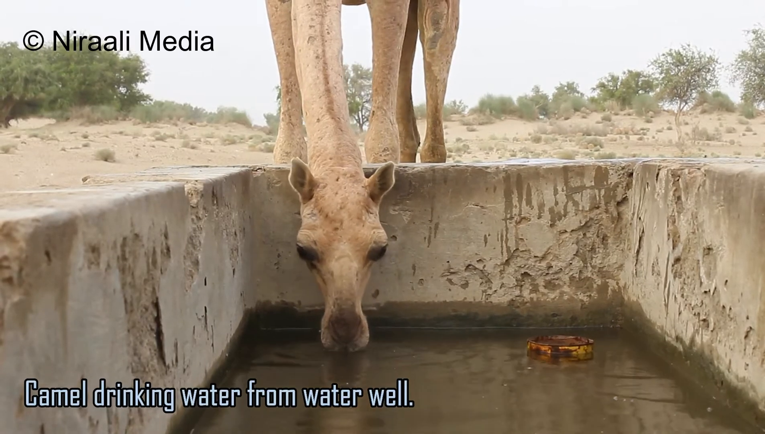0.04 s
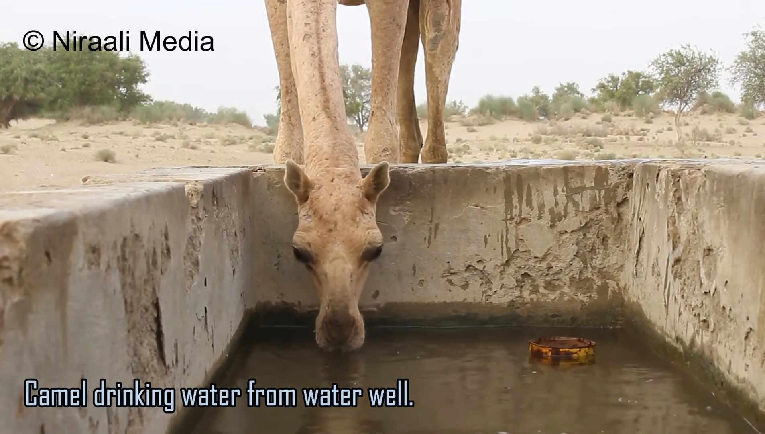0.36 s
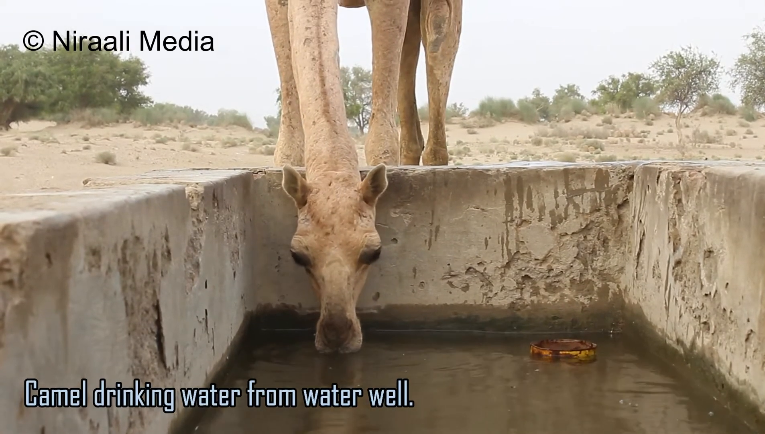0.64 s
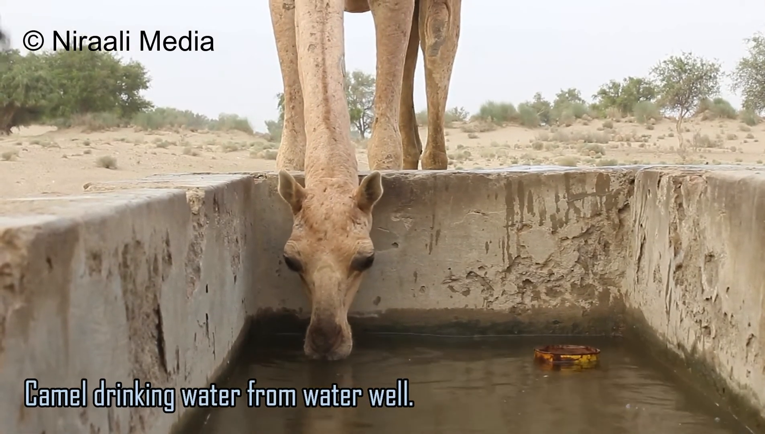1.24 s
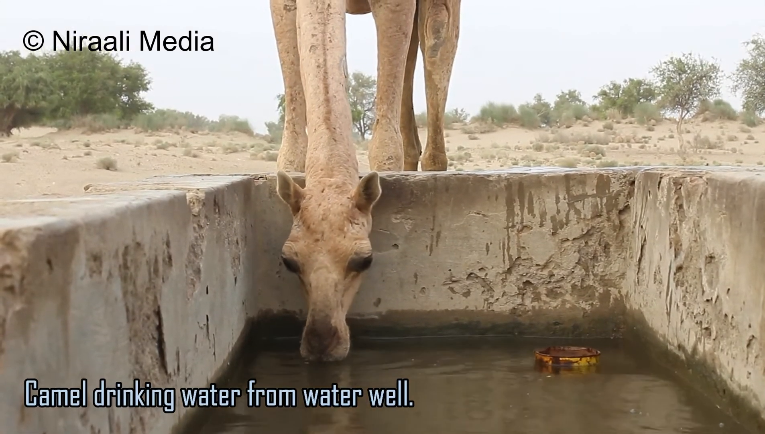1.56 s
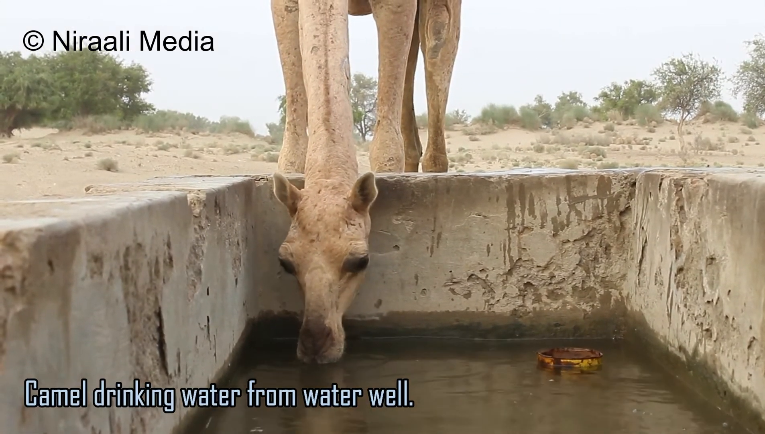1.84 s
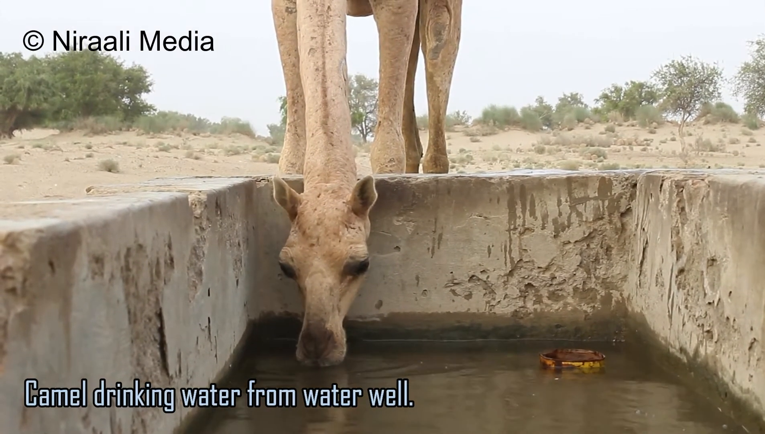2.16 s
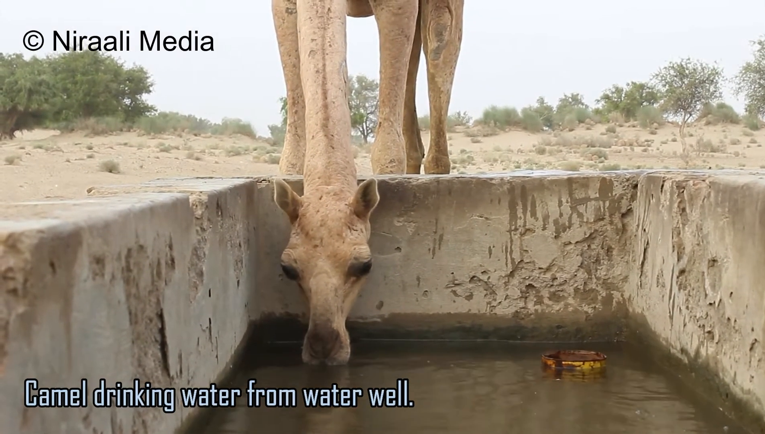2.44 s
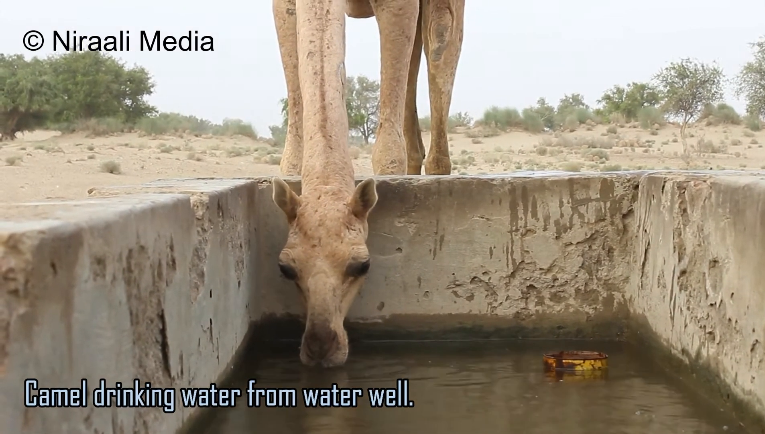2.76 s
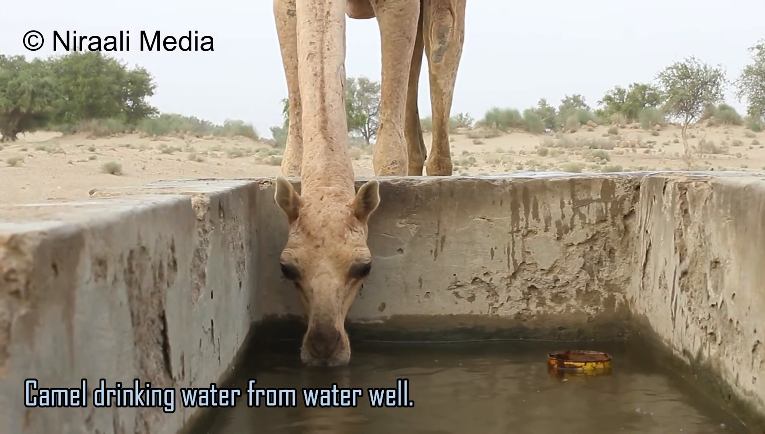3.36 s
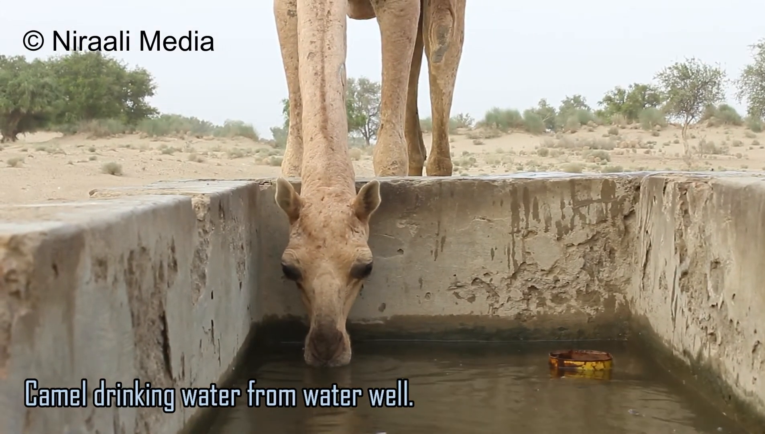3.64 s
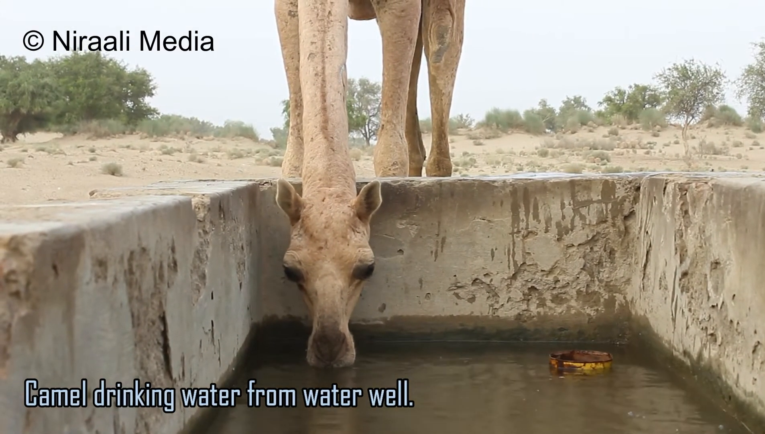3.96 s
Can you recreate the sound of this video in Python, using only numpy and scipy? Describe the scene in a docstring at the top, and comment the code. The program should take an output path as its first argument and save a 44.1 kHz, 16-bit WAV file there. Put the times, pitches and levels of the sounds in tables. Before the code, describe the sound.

Quiet sipping of a camel at a water trough, with wind rumbling on the microphone.

```python
"""A camel sips from a concrete trough in open desert, a few metres from the microphone.
Pockets of air ring as bubbles at its lips, among soft slurps, low sloshes, tiny clicks of snapping
water and one large plop. The trough walls throw the lip sounds back briefly.
Light wind rumbles on the microphone over a faint far-off motor hum and an even hiss."""
import sys
import numpy as np
from scipy import signal
from scipy.fft import rfft, irfft
from scipy.io import wavfile
from scipy.ndimage import uniform_filter1d

SR = 44100
rng = np.random.default_rng(int(sys.argv[2]) if len(sys.argv) > 2 else 0)


def digitize_waveform(pressure):
    """Quantize a signal to 16-bit integers and store it at the path in sys.argv[1].

    Rows of a 2-D input are taken as channels; values are limited to [-1, 1].
    """
    field = np.atleast_2d(pressure).T
    bounded = np.clip(field, -1, 1)
    quanta = np.round(bounded * 32767).astype(np.int16)
    wavfile.write(sys.argv[1], SR, quanta)


N = 176400  # 4 seconds

WATER_PAN_DB, HISS_PAN_DB, BASS_PAN_DB = -3, -1.6, 1.5  # left minus right
RISE_CYCLES, BUBBLE_CYCLES = 0.75, 7.24  # swings a bubble takes to swell, and to fade to about a third


def amp(db):
    """Turns decibels into a gain to multiply by."""
    return 10 ** (np.asarray(db) / 20)


def unit(x):
    """Scales a signal to an average power of one."""
    return x / np.sqrt(np.mean(np.abs(x) ** 2) + 1e-30)


def read(points, hz, column=1):
    """Looks up a table at any pitch, sliding smoothly between its rows."""
    table = np.array(points, float)
    return np.interp(np.log(hz + 1), np.log(table[:, 0] + 1), table[:, column])


def curve(points):
    """Joins (time_s, value) points with straight lines."""
    return np.interp(np.arange(N) / SR, *np.transpose(points))


def pan(db):
    """Left and right gains that make the left side louder by db."""
    return amp(np.array([[.5], [-.5]]) * db)


def add(mix, start_s, sound):
    """Adds a sound to the mix at a given time."""
    part = mix[max(round(start_s * SR), 0):][:len(sound)]
    part += sound[:len(part)]


def noise(colour, same, pan_db):
    """Stereo noise shaped by a colour table; same=1 makes both sides alike, 0 unrelated."""
    hz = np.fft.rfftfreq(N, 1 / SR)
    mid, side = rfft(rng.standard_normal((2, N)))
    spectrum = np.sqrt(1 + same) * mid + np.array([[1], [-1]]) * np.sqrt(1 - same) * side
    return unit(irfft(spectrum * amp(read(colour, hz)) * pan(pan_db), N))


def air(level_db=-58.5):
    """Open air: a low distant wash under a faint steady hiss."""
    # Tone of the air: pitch_hz, relative_db
    colour = [(20, -80), (60, -79), (110, -83), (160, -89), (320, -93), (480, -100), (800, -104),
              (1200, -106), (2200, -110), (4000, -111), (5500, -108), (7500, -115), (12500, -114),
              (16000, -125)]
    # How alike left and right are: pitch_hz, likeness (0 to 1)
    likeness = [(30, 0.75), (120, 0.69), (700, 0.68), (3000, 0.32), (5700, 0.041), (8000, 0.5)]
    hz = np.fft.rfftfreq(N, 1 / SR)
    bass_share = 1 / (1 + (hz / 550) ** 2)
    pan_db = HISS_PAN_DB + (BASS_PAN_DB - HISS_PAN_DB) * bass_share
    return amp(level_db) * noise(colour, read(likeness, hz), pan_db)


def motor(waver=0.57):
    """A far-off motor hums with three wavering low tones."""
    # Tones of the hum (wider ones waver faster): pitch_hz, level_db, width_hz
    tones = [(102.05, -65, 1), (121, -68.5, 2.2), (236.2, -79, 7.6)]
    t, offset_hz = np.arange(N) / SR, np.fft.fftfreq(N, 1 / SR)
    out = np.zeros((2, N))
    for hz, db, width_hz in tones:
        jitter = rng.standard_normal((2, N)) + 1j * rng.standard_normal((2, N))
        keep_slow = np.exp(-(offset_hz / width_hz) ** 2)
        shared, apart = unit(np.fft.ifft(np.fft.fft(jitter) * keep_slow))
        drift = 1 + waver * shared + np.array([[.3], [-.3]]) * apart
        out += amp(db) * unit((drift * np.exp(2j * np.pi * hz * t)).real)
    return pan(BASS_PAN_DB) * out


def wind(gust_half_s=0.057):
    """A breeze and short gusts rumble on the microphone."""
    # Strength of the breeze: time_s, level_db
    breeze = [(0, -54), (.8, -65), (1.5, -51.5), (2.05, -58), (2.7, -52), (2.95, -57), (4, -58.5)]
    # Gusts: middle_s, level_db
    gusts = [(.06, -43), (.45, -48.5), (0.952, -46), (1.1, -48), (1.27, -46), (1.44, -45), (1.62, -45),
             (1.79, -43.5), (2.199, -43), (2.37, -48.5)]
    # Tone of the rumble: pitch_hz, relative_db
    colour = [(5, -12), (22, 8.5), (35, -4.5), (55, -6.5), (90, -14), (160, -35.5), (1500, -73)]
    t = np.arange(N) / SR
    buffets = sum(amp(db) * np.exp(-((t - s) / gust_half_s) ** 2) for s, db in gusts)
    return noise(colour, same=0.52, pan_db=BASS_PAN_DB) * np.hypot(amp(curve(breeze)), buffets)


def sloshes():
    """The muzzle pushes water about in muffled swells."""
    # Swells of water: middle_s, half_length_s, level_db
    swells = [(1.664, 0.15, -62), (2.224, 0.3, -62), (3.357, 0.25, -68)]
    # Tone of the water: pitch_hz, relative_db
    colour = [(60, -60), (130, -0.5), (185, 7), (300, -8), (700, -8.5), (1500, -53)]
    t = np.arange(N) / SR
    loudness = sum(amp(db) * np.exp(-((t - s) / half_s) ** 2) for s, half_s, db in swells)
    return noise(colour, same=0.73, pan_db=0.5) * loudness


def trough(sound, echo_db, build_s=0.0033):
    """A sound followed by a short blur of echoes from the concrete walls."""
    # Echoes of the walls: pitch_hz, fade_s (time to fall 60 dB), relative_db
    walls = [(300, 0.17, -4), (740, 0.32, -12), (1030, 0.17, -0.5), (2070, 0.1, 1.5), (3580, 0.062, 1),
             (5460, 0.11, 1), (8000, 0.28, -9), (12100, .12, -1.5), (15900, 0.034, -5.5)]
    hz, t, spectrum = signal.stft(rng.standard_normal((2, SR // 2)), SR, nperseg=256)
    fade_s, start_db = read(walls, hz)[:, None], read(walls, hz, column=2)[:, None]
    tail = signal.istft(spectrum * amp(start_db - 60 * t / fade_s), SR, nperseg=256)[1]
    tail *= 1 - np.exp(-(np.arange(tail.shape[1]) / SR / build_s) ** 2)
    mid, side = tail / np.linalg.norm(tail[0])
    echoes = amp(echo_db) * (mid + np.array([[1], [-1]]) * amp(-8.0) * side)
    echoes[:, 0] += 1  # the direct sound
    return signal.fftconvolve(sound[None], echoes, axes=1)[:, :N]


def pop(hz, cycles, sag=.1, sag_s=0.015):
    """A small pocket of air opens and rings out, sagging a little in pitch."""
    ring_s = cycles / hz
    t = np.arange(int(6 * ring_s * SR) + 24) / SR
    pitch_hz = hz * (1 - sag * (1 - np.exp(-t / sag_s)))
    shape = (1 - np.exp(-t * hz / RISE_CYCLES)) * np.exp(-(t / ring_s) ** 1.11)
    return shape / shape.max() * np.sin(2 * np.pi * np.cumsum(pitch_hz) / SR)


def faint_pops(colour, per_s, cycles, spread_db, clump, tries=6000):
    """Sipping makes many faint pops of all sizes, arriving in little clusters."""
    # Strength of the sipping: time_s, gain_db
    sipping = [(0, -4), (.7, -3.5), (1.4, -3), (2.2, -1.5), (2.65, -2), (3.05, 0.5), (3.35, -2.5), (4, 1)]
    out = np.zeros(N)
    bursts = np.exp(clump * unit(uniform_filter1d(rng.standard_normal(N), size=1800)))
    chance = bursts / bursts.mean() * per_s * N / SR / tries
    low_hz, high_hz = colour[0][0], colour[-1][0]
    for when, dice, pitch, ring, softness in rng.random((tries, 5)):
        if dice < chance[int(when * N)]:
            hz = low_hz * (high_hz / low_hz) ** pitch
            db = read(colour, hz) + spread_db * (min(-np.log(softness), 2) - 1)
            add(out, when * N / SR, amp(db) * pop(hz, cycles * (.5 + ring)))
    return out * amp(curve(sipping))


def slurps(count=50, spread_s=.028, centre_hz=2695, spread_octaves=0.54):
    """Water drawn between the lips makes clouds of tiny bubbles, too dense to tell apart."""
    # Slurps: middle_s, bubble_level_db
    clouds = [(0.578, -74), (2.61, -63.5), (2.8, -68), (3.0, -68), (3.82, -65.5)]
    out = np.zeros(N)
    for middle_s, db in clouds:
        for when, pitch in rng.standard_normal((count, 2)):
            hz = centre_hz * 2 ** (spread_octaves * pitch)
            add(out, middle_s + spread_s * when, amp(db) * pop(hz, BUBBLE_CYCLES / 2))
    return out


def spray(hz, fade_s=0.017, top_hz=13500, grain_db=0.5, size=4096):
    """Tiny droplets make a grainy puff of noise, spread about an octave either side of a pitch."""
    hiss = rng.standard_normal(size)
    grains = hiss * amp(grain_db * np.repeat(rng.standard_normal(size // 32), 32))
    all_hz = np.fft.rfftfreq(size, 1 / SR) + 1
    colour = np.exp(-.5 * np.log2(all_hz / hz) ** 2) / (1 + (all_hz / top_hz) ** 10)
    return unit(irfft(rfft(grains) * colour)) * np.exp(-np.arange(size) / SR / fade_s)


def tick(hz, ring_s=.00005):
    """A film of water snaps: a smooth burst of a few swings."""
    t = np.arange(96) / SR
    shape = t ** 2 * np.exp(-t / ring_s)
    return shape / shape.max() * np.cos(2 * np.pi * hz * (t - 2 * ring_s))


def lip_clicks():
    """Wet lips click, each time with a puff of spray, over a fine crackle."""
    # Fine crackle: pitch_hz, level_db
    crackle = [(3000, -56), (5500, -59.5), (8000, -54), (12000, -57), (14500, -58)]
    # Single clicks: start_s, pitch_hz, click_level_db, spray_level_db
    clicks = [ (0.128, 12000, -45.5, -74), (0.15, 6500, -47.5, -71), (.193, 7000, -46, -60),
              (0.291, 7500, -45, -66), (0.399, 9000, -59, -64.5), (.563, 6740, -43, -81),
              (0.805, 10100, -49, -65), (.920, 7900, -42.5, -78), (1.042, 5850, -44, -60),
              (1.268, 6600, -44.5, -63), (1.334, 10000, -43.5, -64), (1.343, 6700, -55, -58.5),
              (1.359, 7600, -48, -64), (1.452, 11200, -47.5, -71), (1.659, 10500, -47.5, -70),
              (1.815, 6500, -35, -58), (2.266, 12700, -25, -65), (2.2678, 10900, -39, -64),
              (2.309, 3160, -41, -64.5), (2.368, 6400, -44, -65.5), (2.454, 9200, -41, -58),
              (2.623, 6750, -51, -64), (2.9, 6600, -44.5, -64), (3.157, 10200, -45.5, -61),
              (3.347, 5000, -40, -68), (3.420, 8500, -49, -70), (3.449, 8300, -43, -86),
              (3.667, 10900, -46, -69), (3.889, 9800, -51, -60.5)]
    out = faint_pops(crackle, per_s=300, cycles=1, spread_db=6.5, clump=.9)
    for start_s, hz, click_db, spray_db in clicks:
        add(out, start_s, amp(click_db) * tick(hz))
        add(out, start_s, amp(spray_db) * spray(hz))
    return out


def lip_bubbles():
    """Clear bubbles pop at the lips among many faint ones."""
    # Faint bubbles: pitch_hz, level_db
    fizz = [(900, -73.5), (1100, -68), (1700, -68.5), (2400, -62), (3800, -68.5), (5500, -59)]
    # Clear bubbles: start_s, pitch_hz, level_db
    bubbles = [ (.004, 1494, -55.5), (0.045, 4800, -55), (.290, 5060, -49), (0.309, 1100, -54),
               (.309, 5060, -58), (0.477, 1310, -58), (.577, 2140, -55), (.680, 1620, -51.5),
               (.755, 1250, -54), (.886, 2570, -55.5), (1.028, 700, -57), (1.117, 1066, -50),
               (1.269, 2410, -53), (1.343, 5640, -46.5), (1.401, 1724, -54.5), (1.453, 3880, -50.5),
               (1.465, 1490, -52), (1.492, 2210, -55), (1.619, 1016, -52), (1.622, 1262, -49),
               (1.646, 770, -57.5), (1.76, 5100, -50), (1.788, 1590, -56.5), (1.825, 1048, -51),
               (1.899, 2650, -55), (2.013, 1440, -56), (2.066, 1260, -53.5), (2.108, 1640, -55.5),
               (2.15, 3400, -55), (2.267, 1011, -51.5), (2.308, 2700, -48.5), (2.332, 3190, -54),
               (2.334, 1775, -50), (2.501, 1870, -53), (2.568, 1440, -56), (2.784, 2660, -54),
               (2.807, 4720, -53), (2.833, 1277, -52.5), (2.853, 3000, -53), (2.942, 1256, -54.5),
               (2.974, 2410, -52.5), (3.070, 3240, -56), (3.179, 1926, -53.5), (3.277, 2740, -53),
               (3.305, 1710, -51.5), (3.424, 1350, -56.5), (3.481, 1366, -55), (3.518, 1460, -51.5),
               (3.571, 2640, -53), (3.652, 1170, -56), (3.788, 1810, -55), (3.794, 970, -58),
               (3.808, 2590, -50), (3.874, 1586, -51), (3.9, 2570, -51), (3.967, 2920, -53)]
    out = faint_pops(fizz, per_s=300, cycles=5.5, spread_db=3.5, clump=0.56)
    for start_s, hz, db in bubbles:
        add(out, start_s, amp(db) * pop(hz, BUBBLE_CYCLES))
    return out


def plop(start_s=2.8488, start_hz=961, level_db=-40.5, ring_s=0.015, sag_per_s=7.3):
    """A large pocket of air slides down in pitch and is choked off."""
    out = np.zeros(N)
    t = np.arange(SR // 10) / SR
    pitch_hz = start_hz * np.exp(-sag_per_s * t)
    shape = (1 - np.exp(-t * start_hz / RISE_CYCLES)) * np.exp(-(t / ring_s) ** 2)
    note = amp(level_db) * shape * np.sin(2 * np.pi * np.cumsum(pitch_hz) / SR)
    add(out, start_s, note)
    add(out, start_s + 0.044, amp(-20) * note)  # one echo off the far wall
    return out


def drinking():
    """The sounds at the camel's lips echo inside the trough."""
    bubbles = slurps() + lip_bubbles()
    clicks = lip_clicks()
    water = trough(bubbles, echo_db=-8) + trough(clicks, echo_db=-9) + trough(plop(), echo_db=-14.5)
    return pan(WATER_PAN_DB) * water


def scene():
    """The drinking camel in its surroundings."""
    return drinking() + sloshes() + wind() + air() + motor()


def record(dry, top_hz=16000):
    """The microphone lifts the treble, and the very highest sounds are cut off."""
    # Tone of the microphone: pitch_hz, gain_db
    colour = [(4000, 1), (9000, 3), (12500, 4), (14500, 5), (16000, 2)]
    gain = amp(read(colour, np.fft.rfftfreq(N, 1 / SR)))
    brightened = irfft(rfft(dry) * gain, N)
    treble_cut = signal.firwin(401, top_hz, window=("kaiser", 8), fs=SR)
    return signal.oaconvolve(brightened, treble_cut[None], "same")


dry = scene()
out = record(dry)
digitize_waveform(out)
```